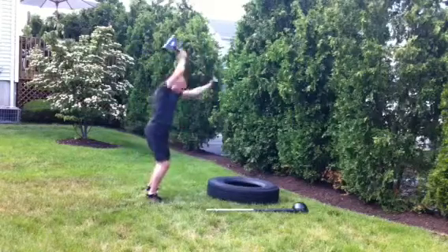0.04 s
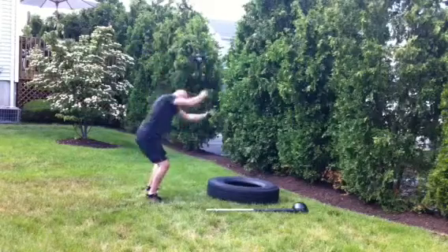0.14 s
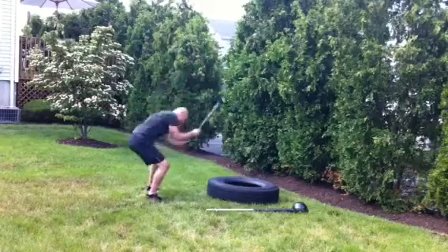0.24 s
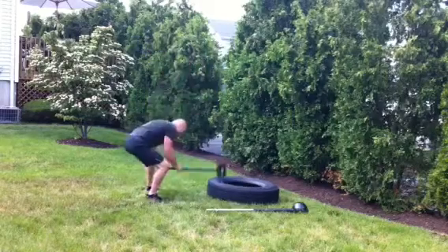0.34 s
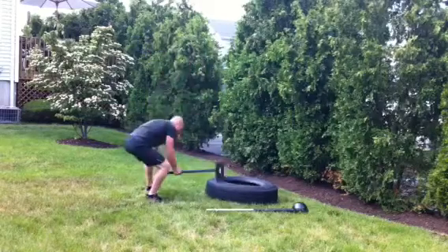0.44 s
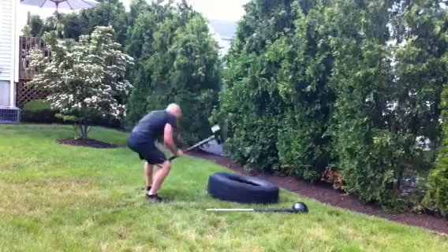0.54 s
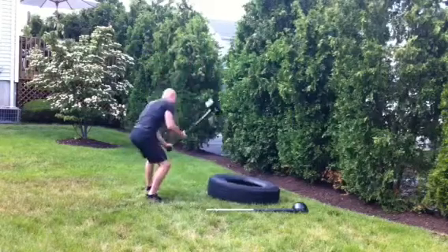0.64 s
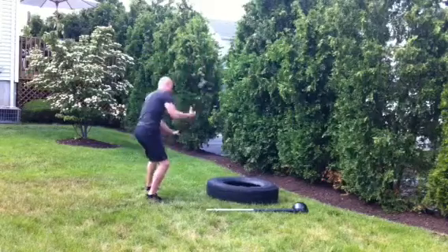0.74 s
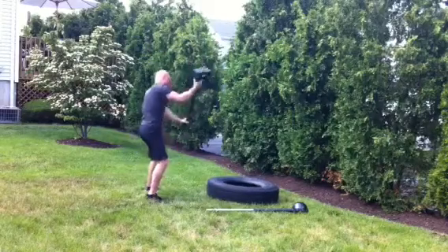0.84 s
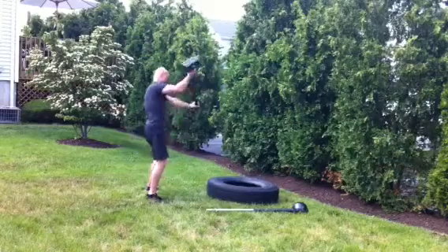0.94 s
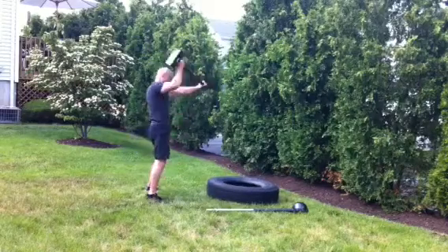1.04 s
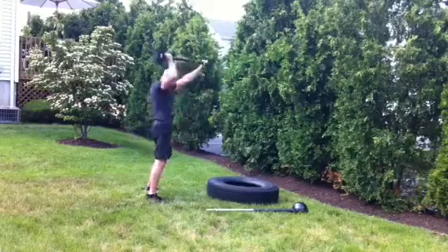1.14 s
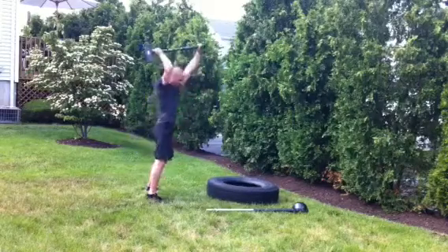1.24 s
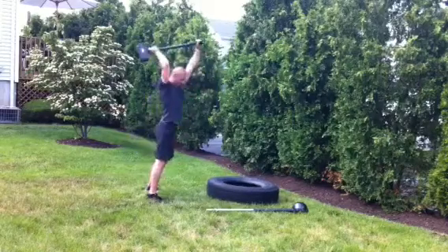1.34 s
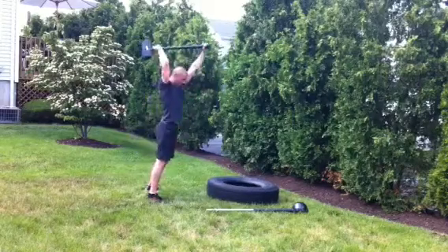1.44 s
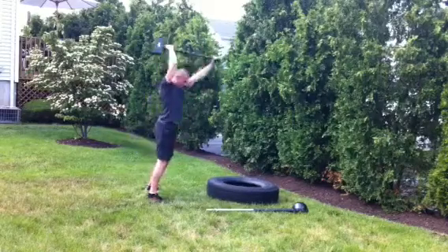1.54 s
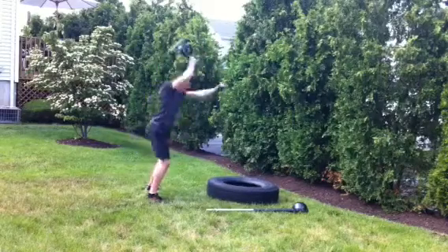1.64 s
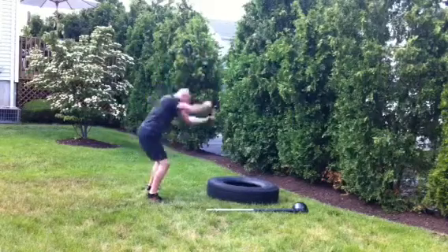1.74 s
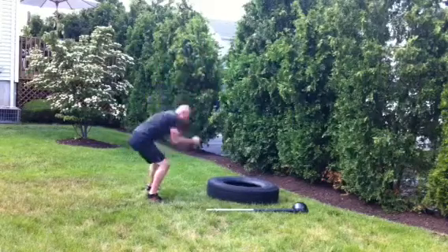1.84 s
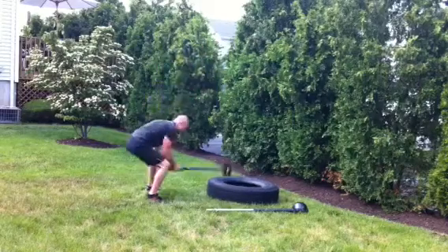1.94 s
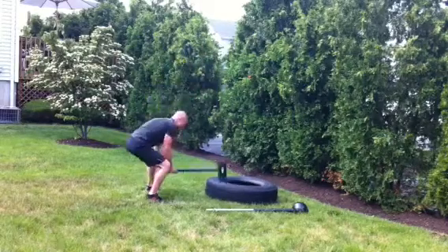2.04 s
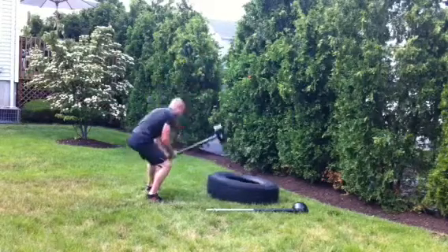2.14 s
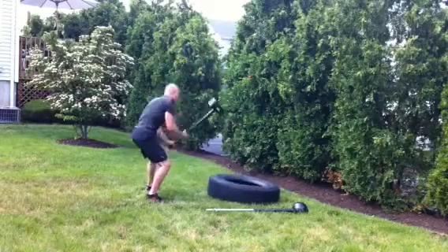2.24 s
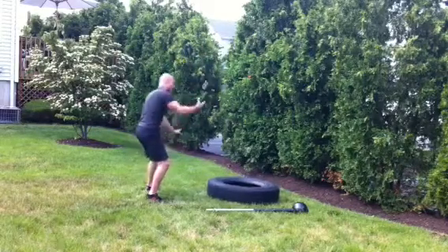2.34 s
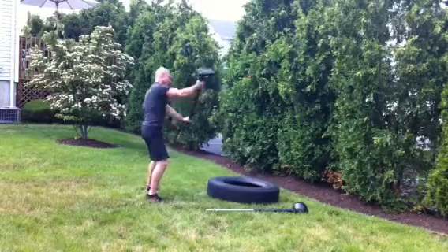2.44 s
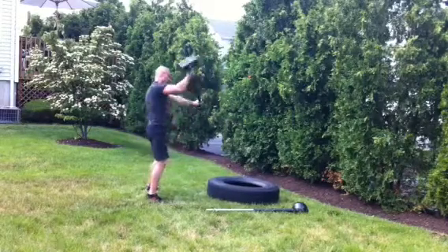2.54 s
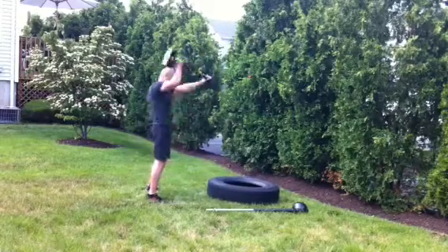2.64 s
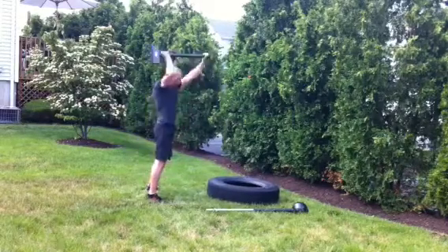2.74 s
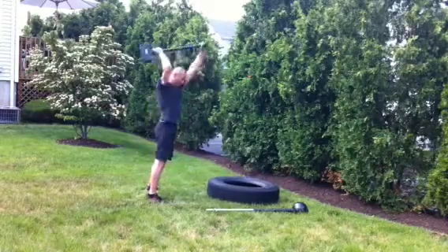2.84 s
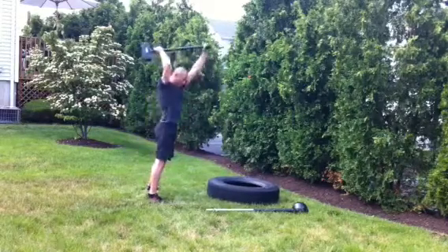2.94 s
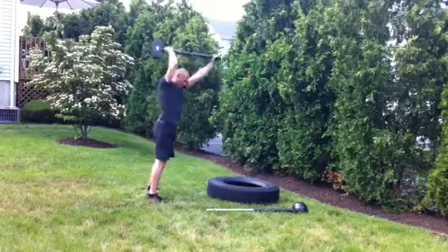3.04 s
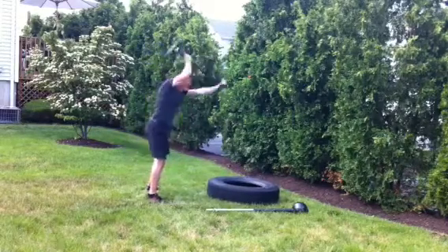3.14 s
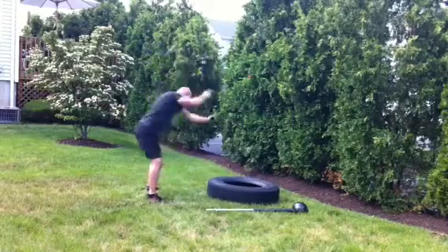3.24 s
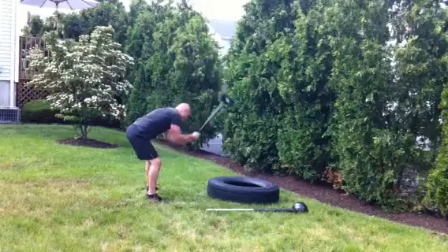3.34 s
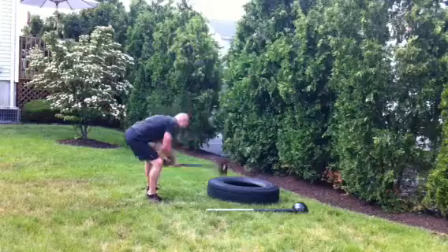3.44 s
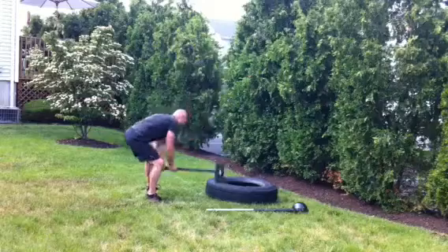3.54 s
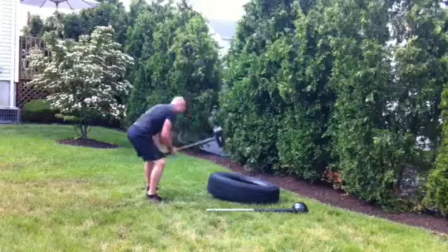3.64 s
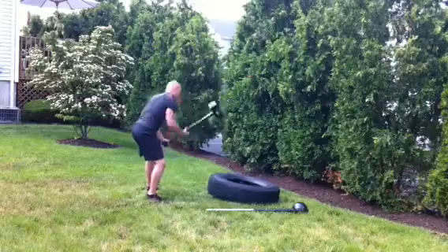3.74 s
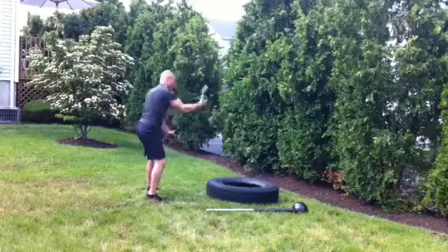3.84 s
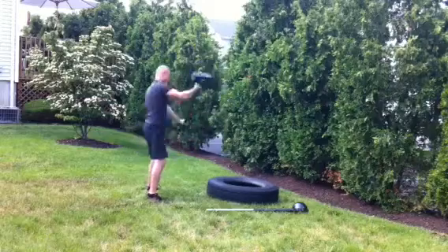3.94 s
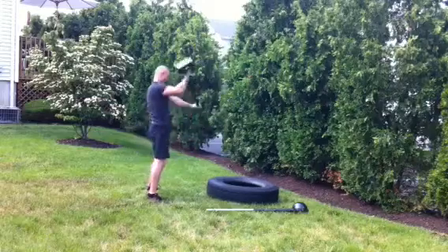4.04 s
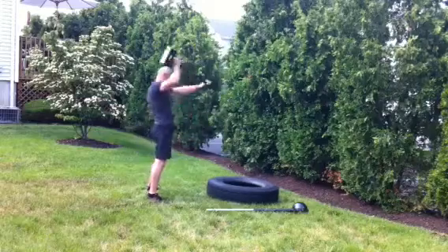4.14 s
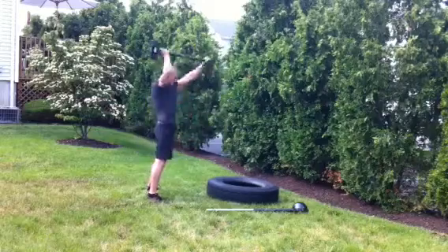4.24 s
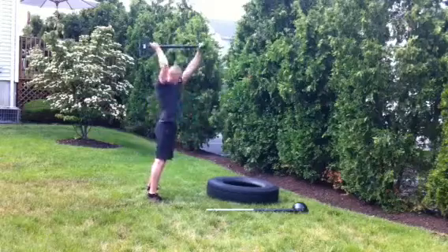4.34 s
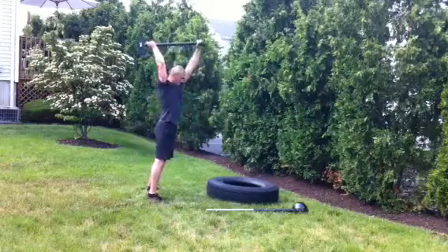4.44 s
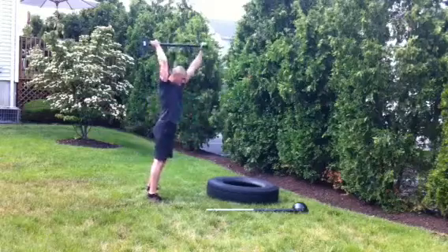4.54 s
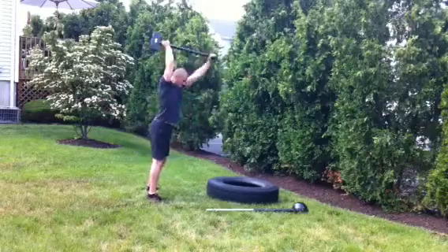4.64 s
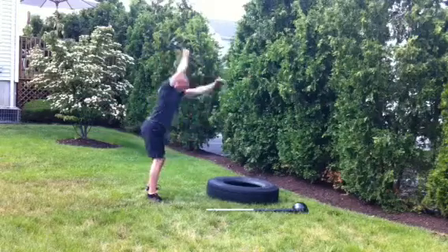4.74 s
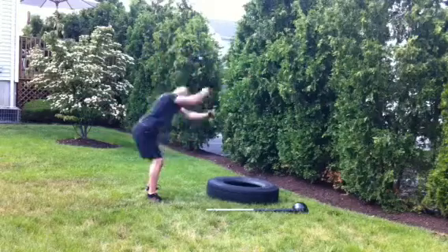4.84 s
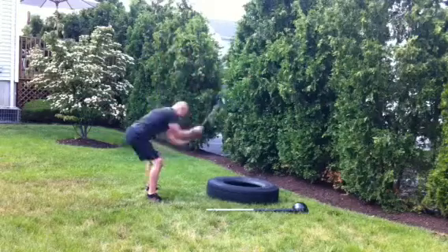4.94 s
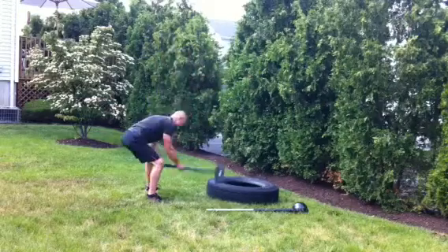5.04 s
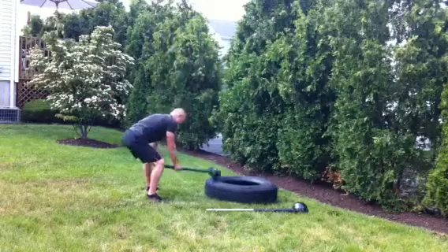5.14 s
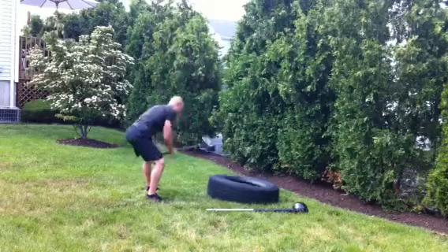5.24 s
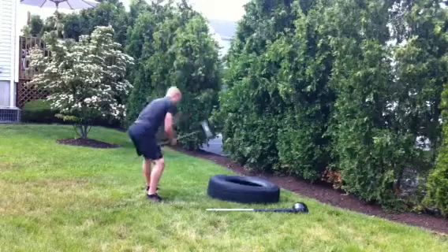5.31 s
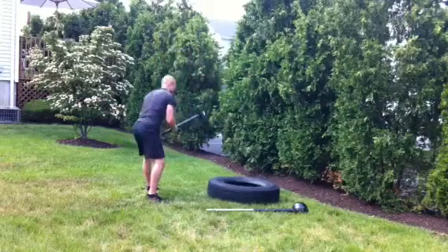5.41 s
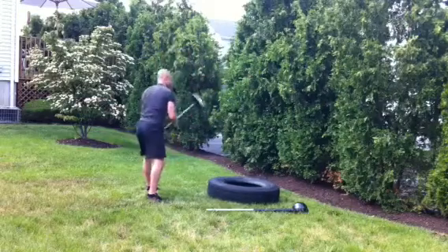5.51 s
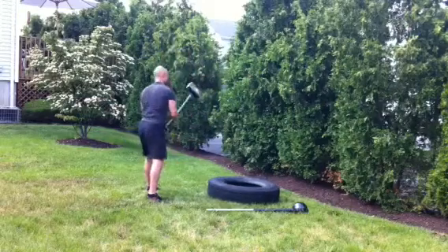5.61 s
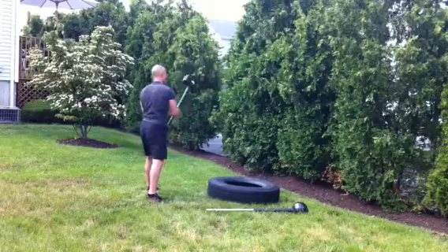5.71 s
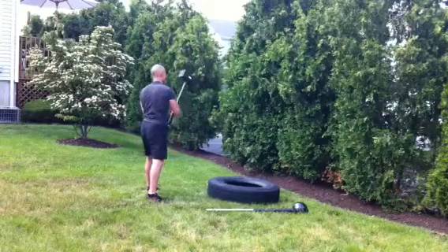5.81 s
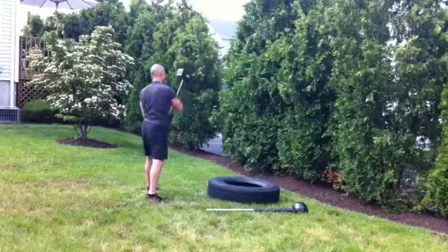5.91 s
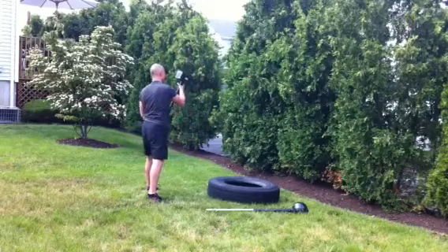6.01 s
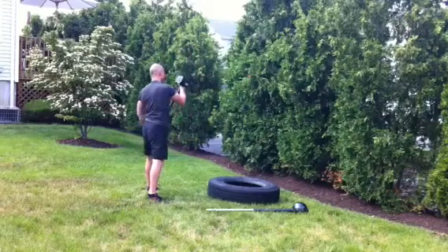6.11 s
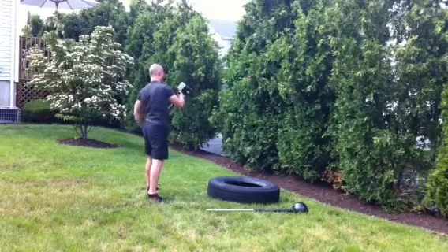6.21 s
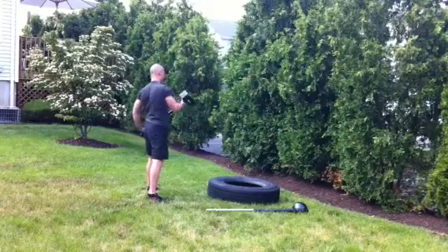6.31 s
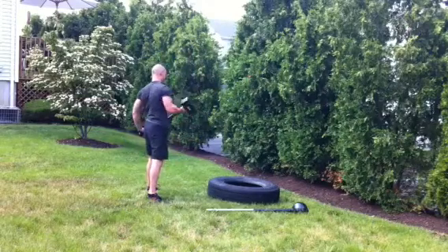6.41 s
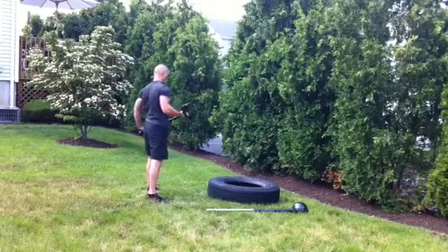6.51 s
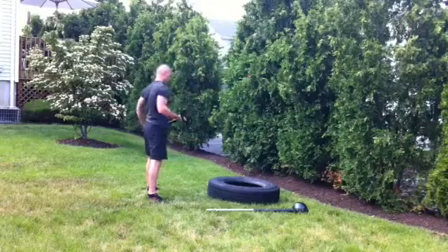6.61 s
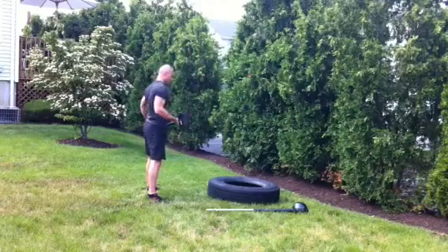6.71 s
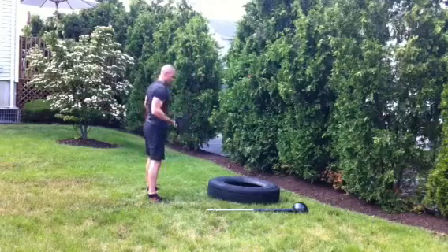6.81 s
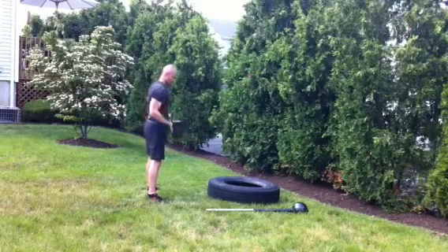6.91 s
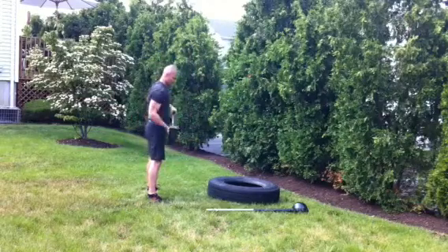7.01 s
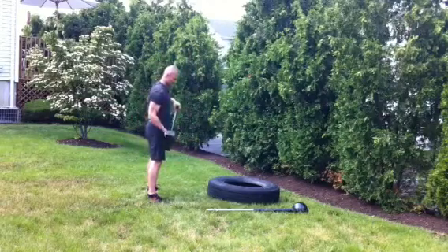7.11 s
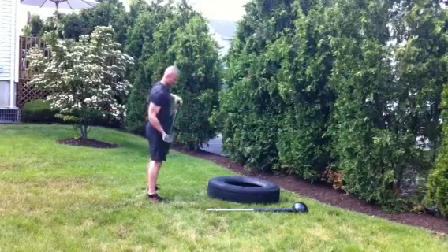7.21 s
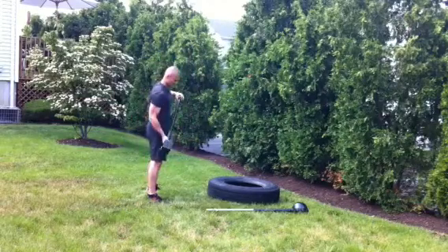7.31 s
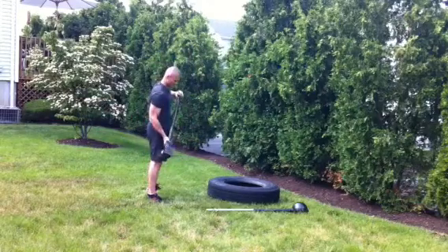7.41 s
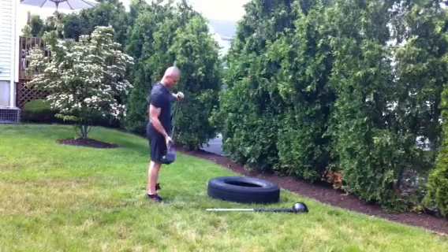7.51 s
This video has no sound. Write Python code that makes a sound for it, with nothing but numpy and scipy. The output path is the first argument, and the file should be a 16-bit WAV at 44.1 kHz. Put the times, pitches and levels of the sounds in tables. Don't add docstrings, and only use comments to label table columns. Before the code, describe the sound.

In a quiet garden, a sledgehammer hits a rubber tyre four times, roughly a second and a half apart. Each blow is a loud, blunt crack with a hollow low thud that dies quickly, followed by the tyre softly bouncing on turf. Faint hand squeaks and rubs precede the swings. Low distant traffic and a weak fan hum continue beneath. The microphone is modest, somewhat distant, with thin bass.

```python
import sys
import numpy as np
from scipy import signal
from scipy.fft import rfft, irfft
from scipy.io import wavfile
from scipy.ndimage import uniform_filter1d

SR = 44100
rng = np.random.default_rng(int(sys.argv[2]) if len(sys.argv) > 2 else 0)


def generate_wav(sig):
    pcm = np.round(np.clip(np.atleast_2d(sig).T, -1, 1) * 32767).astype(np.int16)
    wavfile.write(sys.argv[1], SR, pcm)


def invert_db(x):
    u = np.asarray(x, float) / 20
    return 10 ** u


N = 333396


def evened(x):
    return x / np.sqrt(np.mean(x ** 2) + 1e-20)


def read(points, hz):
    f, value = np.transpose(points)
    return np.interp(np.log(hz + 1), np.log(f + 1), value)


def add(mix, s, sound):
    part = mix[round(s * SR):][:len(sound)]
    part += sound[:len(part)]


def coloured(x, points):
    hz = np.fft.rfftfreq(len(x), 1 / SR)
    return irfft(rfft(x) * invert_db(read(points, hz)), len(x))


def resonate(x, hz, width):
    turn = np.exp(2j * np.pi * np.cumsum(hz * np.ones(len(x))) / SR)
    r = np.exp(-np.pi * width / SR)
    return 2 * (turn * signal.lfilter([1 - r], [1, -r], x / turn + 1e-18)).real


def resonate_twice(x, hz, width, second_width):
    return resonate(resonate(x, hz, width), hz, second_width)


def mode(hz, t60, t):
    return -np.sin(2 * np.pi * hz * t) * invert_db(-60 * t / t60)


BLOW_TIMES = [.51764, 2.1227, 3.62635, 5.21895]
# [level_db, slap_pitch_hz, crack_level_db, echo_level_db, echo_ring_hz]
BLOWS = [
    (-20, 560, -9.5, -9.5, 2800),
    (-12, 310, -18, -24, 3900),
    (-19, 860, -7.5, -5.5, 3600),
    (-15, 440, -5.5, -10.5, 4900),
]
# [pitch_hz, level_db, t60_s]
CARCASS_MODES = [
    [(195.6, -7, 0.24), (255.4, -1.5, 0.17), (299, -2, 0.09), (495, -20, 0.47), (680, -14, 0.065)],
    [(181, 5, 0.099), (216, -3.5, 0.29), (250.8, -5, 0.21), (303, -9, 0.069), (372, -7.5, 0.08),
     (470, -13, 0.15)],
    [(151, 0, 0.11), (215.5, -6.5, 0.34), (260, -6, 0.08), (320, -0.5, 0.11), (362, 0, 0.063),
     (460, -34, 0.18), (590, 3.5, 0.056)],
    [(222, -31, 0.25), (289.5, -11, 0.25), (375, -5.5, 0.089), (548, -10.5, 0.087)],
]
# [tread_knock_hz, tread_over_ring_db, head_ring_hz, cavity_level_db, tail_stretch]
AFTERMATH = [
    (568, 3.5, 7230, 3.5, 1.07),
    (824, -5, 4100, 0, 1.13),
    (646, 6, 4700, -3, 1.37),
    (620, -10, 2150, 3, 1.08),
]
CAVITY_HZ, CAVITY_T60_S, CAVITY_LAG_S, CAVITY_RISE_S = 135.6, 0.21, 0.0064, 0.0055
CRACK_T60_S, ECHO_T60_S, ECHO_DELAY_S = 0.009, 0.017, 0.0112
BITE_HZ, BITE_DB, BITE_T60_S = 4800, -1, 0.0045
UNDER_HZ, UNDER_DB, UNDER_T60_S = 2210, -8.5, 0.0093


def hammer():
    out = np.zeros(N)
    t = np.arange(SR * 3 // 4) / SR
    push = np.hanning(14)
    push /= push.sum()
    air_ring = mode(CAVITY_HZ, CAVITY_T60_S, t) * (1 - np.exp(-t / CAVITY_RISE_S))
    for s, blow, modes, after in zip(BLOW_TIMES, BLOWS, CARCASS_MODES, AFTERMATH):
        db, slap_hz, crack_db, echo_db, echo_hz = blow
        tread_hz, tread_db, head_hz, cavity_db, stretch = after
        body = sum(invert_db(d) * mode(f, t60, t) for f, d, t60 in modes)
        body += invert_db(8.0) * mode(slap_hz, 0.011, t)
        body += invert_db(tread_db) * mode(tread_hz, 0.048, t)
        add(out, s, invert_db(db) * np.convolve(body, push))
        add(out, s + CAVITY_LAG_S, invert_db(db + cavity_db) * air_ring)
        add(out, s, invert_db(crack_db) * crack(CRACK_T60_S, head_hz, 1.23))
        echo = crack(ECHO_T60_S, echo_hz, 0.28)
        add(out, s + ECHO_DELAY_S, invert_db(echo_db) * echo)
        add(out, s, invert_db(crack_db + BITE_DB) * mode(BITE_HZ, BITE_T60_S, t[:800]))
        add(out, s, invert_db(crack_db + UNDER_DB) * mode(UNDER_HZ, UNDER_T60_S, t[:800]))
        add(out, s, scatter(-24, stretch))
    return out


# [pitch_hz, level_db]
CRACK_SPECTRUM = [(200, 23), (800, 16.5), (2000, 8.5), (5000, -0.5), (9000, 3.5), (15000, 2.5)]


def crack(t60, hz, spike):
    t = np.arange(1024) / SR
    spray = evened(coloured(rng.standard_normal(len(t)), CRACK_SPECTRUM))
    ring = evened(resonate(spray, hz, 600))
    return (0.5 * spray + 0.25 * ring) * invert_db(-60 * t / t60) - spike * np.exp(-t / 0.00024)


# [pitch_hz, level_db per Hz]
SCATTER_SPECTRUM = [(70, -20), (125, 6), (200, -2.5), (310, -4), (660, -13), (1950, -23.5), (14700, -25.5),
                    (16000, -43)]
# [pitch_hz, t60_s]
SCATTER_DECAY = [(150, 0.43), (400, 0.12), (1000, 0.33), (2500, 0.31), (6000, 0.25), (14000, 0.17)]


def scatter(db, stretch):
    hz, t, z = signal.stft(rng.standard_normal(SR), SR, nperseg=256)
    fade = invert_db(-60 * t / stretch / read(SCATTER_DECAY, hz)[:, None])
    fade += invert_db(-31.5 - 60 * t / 3.04)
    x = signal.istft(z * fade, SR, nperseg=256)[1]
    x = coloured(x, SCATTER_SPECTRUM)[:SR * 3 // 4]
    rise = 1 - np.exp(-np.arange(len(x)) / SR / 0.0028)
    return invert_db(db) * rise * x / np.std(x[:2000])


# [delay_after_blow_s, pitch_hz, length_s]
HOPS = [
    (.054, 136.2, 0.03),
    (.11, 222.6, .065),
    (.141, 126.2, 0.094),
    (.222, 142, .08),
    (.345, 140, 0.096),
]
HOP_LEVELS = [(-34, -37.5, -39, -42.5, -63), (-37, -39, -37, -35.5, -48), (-48, -38, -39.5, -54, -60),
              (-39, -48.5, -35, -43, -54)]


def hops():
    out = np.zeros(N)
    for s, levels in zip(BLOW_TIMES, HOP_LEVELS):
        for (delay, hz, length), db in zip(HOPS, levels):
            u = np.linspace(0, 1, max(round(length * SR), 2))
            climbing_hz = hz * (1 + 0.052 * (u - 0.5))
            tone = np.sin(2 * np.pi * np.cumsum(climbing_hz) / SR)
            add(out, s + delay, invert_db(db) * tone * np.sin(np.pi * u ** 0.74))
    return out


# [peak_s, level_db, pitch_hz, second_harmonic_db, fade_t60_s]
SQUEAKS = [(.306, -57.5, 9670, -20, .2), (.322, -53, 8560, -15, .2), (.348, -46, 6750, -3, .12),
           (.39, -57, 6330, -8, 0.34), (1.897, -57.5, 9540, -15, 0.29), (1.948, -53, 7900, -8, 0.059),
           (1.997, -68, 7300, 8, .1), (3.476, -37.5, 7720, -2.5, .12), (3.523, -55, 7500, 9, .16),
           (3.53, -44.5, 8160, -7, 0.13), (5.034, -39, 7720, -4.5, 0.2)]
# [middle_s, level_db, length_s]
SLIDES = [(0.345, -57.5, 0.15), (0.987, -64, 0.035), (1.33, -58, 0.23), (1.95, -59, 0.15),
          (2.367, -55.5, 0.04), (2.703, -61, 0.057), (2.896, -58, 0.21), (4.062, -60, 0.11),
          (4.18, -64, 0.11), (4.378, -57, 0.21), (5.057, -59.5, 0.17), (5.463, -54, 0.16),
          (5.734, -67, 0.098)]
# [pitch_hz, level_db per Hz]
RUB_SPECTRUM = [(1200, -9), (2200, -9), (4000, -3.5), (7000, -4), (10000, -6), (14500, -5), (16000, -14)]
# [start_s, level_db, pitch_hz, t60_s]
GRIPS = [
    (2.394, -43, 1050, 0.092),
    (3.276, -40, 890, 0.097),
    (4.027, -42, 2530, 0.088),
]
HOLLOW_HZ, HOLLOW_WIDTH_HZ, HOLLOW_DB = 4560, 590, -10.5
GRAIN_DB = 2
TICK_DB, TICK_S = -7, 0.001


def palm():
    out = np.zeros(N)
    for row in SQUEAKS:
        add(out, *squeak(*row))
    clock = np.arange(N) / SR
    strokes = sum(invert_db(db) * np.exp(-(2 * (clock - s) / length) ** 2) for s, db, length in SLIDES)
    skin, hollow, drag = rng.standard_normal((N, 3)).T
    rub = evened(coloured(skin, RUB_SPECTRUM))
    rub += invert_db(HOLLOW_DB) * evened(resonate_twice(hollow, HOLLOW_HZ, HOLLOW_WIDTH_HZ, HOLLOW_WIDTH_HZ))
    grain = evened(uniform_filter1d(uniform_filter1d(drag, 500), 500))
    out += strokes * rub * invert_db(GRAIN_DB * grain)
    t = np.arange(6000) / SR
    for s, db, hz, t60 in GRIPS:
        knock = evened(resonate_twice(rng.standard_normal(len(t)), hz, 0.92 * hz, 1.4 * hz))
        envelope = invert_db(db - 8 - 60 * t / t60) + invert_db(db + TICK_DB) * np.exp(-t / TICK_S)
        add(out, s, envelope * knock)
    return out


SLIP_DB = 3.2
RISE_SHARE, SNAP = 0.72, 0.54
BLUR_S = 0.09
CLIMB, CLIMB_S, HARD_DB = 0.15, 0.03, -46.5


def squeak(s, db, pitch_hz, octave_db, t60):
    t = np.arange(-2000, 8000) / SR
    hard = min(invert_db(db - HARD_DB), 1)
    from_peak = np.where(t < 0, -t / (RISE_SHARE * (1 - SNAP * hard)), t)
    level_db = db - 60 * from_peak / t60
    hz = pitch_hz * (1 - CLIMB * hard * np.clip(-t / CLIMB_S, 0, 1))
    octave_hz = np.minimum(1.95 * hz, 15700)
    a, b, c, d, slips = rng.standard_normal((len(t), 5)).T
    blur = np.clip(BLUR_S / t60, 0, 1) ** 2
    tone = (1 - 0.29 * blur) * evened(resonate_twice(a, hz, 250, 470))
    tone += blur * evened(resonate_twice(c, hz, 2200, 2200))
    octave = (1 - blur) * evened(resonate_twice(b, octave_hz, 350, 600))
    octave += blur * evened(resonate_twice(d, octave_hz, 2400, 2400))
    slips = evened(uniform_filter1d(uniform_filter1d(slips, 130), 130))
    grip = evened(invert_db(SLIP_DB * slips))
    sound = invert_db(level_db) * grip * (tone + invert_db(octave_db) * octave)
    return s + t[0], sound * signal.windows.tukey(len(t), 0.08)


# [pitch_hz, level_db per Hz]
TRAFFIC_SPECTRUM = [(15, -40), (25, -32), (74, -40), (135, 4.5), (197, -0.5), (232, -16), (266, -7),
                    (358, -10), (433, -9), (854, -8.5), (1120, -8.5), (1220, -12), (7300, -26.5),
                    (15200, -32), (16500, -26.5)]
TRAFFIC_DB = -55
# [pitch_hz, level_db]
FAN_HUM = [(236.9, -65.5), (360.7, -66.5)]
# [pitch_hz, level_db]
FAN_WHINE = [(470.6, -76), (882.2, -74), (1059.5, -74.5), (2177.8, -87), (2295.8, -82.5), (2414.2, -83)]


def garden():
    frames, hz = N // 256 + 5, np.fft.rfftfreq(1024, 1 / SR)
    a, b, patches = rng.standard_normal((frames, 513, 3)).T
    patches = evened(uniform_filter1d(uniform_filter1d(patches, 8, 0), 16, 1))
    z = (a + 1j * b) * invert_db(read(TRAFFIC_SPECTRUM, hz)[:, None] + 0.84 * patches)
    out = invert_db(TRAFFIC_DB) * evened(signal.istft(z, nperseg=1024, noverlap=768)[1][:N])
    for orders, width_hz in ((FAN_WHINE, 1.1), (FAN_HUM, 5.8)):
        for f, db in orders:
            out += invert_db(db) * evened(resonate(rng.standard_normal(N), f, width_hz))
    return out


def scene():
    return (hammer() + hops() + palm() + garden())[None]


STALE_SPANS = [(255, 291), (300, 319)]
BLOCK, STALE_LAG = 1024, 2057


def stale_buffer(x):
    n = np.arange(N)
    stale = sum((n % BLOCK >= a) & (n % BLOCK < b) for a, b in STALE_SPANS) * (n >= STALE_LAG)
    return x[:, n - STALE_LAG * stale]


def before_blows(x):
    treble = signal.sosfiltfilt(signal.butter(4, 1700, "high", fs=SR, output="sos"), x)
    for s, (_, _, crack_db, *_) in zip(BLOW_TIMES, BLOWS):
        hit = round(s * SR)
        lead, end = hit - 220, hit - 20
        start = lead - (lead - 800) % BLOCK
        x[:, start:end] -= treble[:, start:end] * signal.windows.tukey(end - start, 0.15)
        x[:, lead:hit] += invert_db(crack_db - 26) * np.linspace(0.2, 1, 220) * rng.standard_normal(220)
    return x


def top_cut(x):
    return signal.sosfilt(signal.butter(12, 17000, fs=SR, output="sos"), x)


def record(dry):
    x = signal.sosfilt(signal.butter(4, 105, "high", fs=SR, output="sos"), dry)
    x = 0.95 * np.tanh(x / 0.92)
    x = before_blows(stale_buffer(x))
    x = signal.oaconvolve(x, signal.firwin(255, 16070, fs=SR)[None], "same")
    return top_cut(x)


dry = scene()
out = record(dry)
generate_wav(out)
```